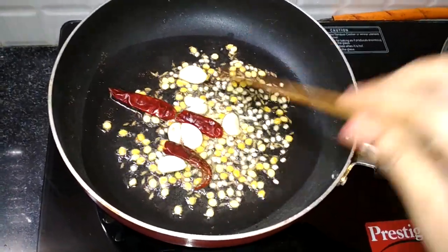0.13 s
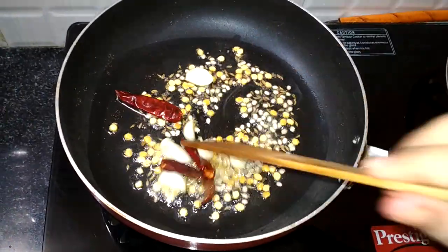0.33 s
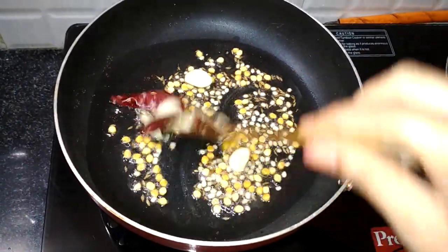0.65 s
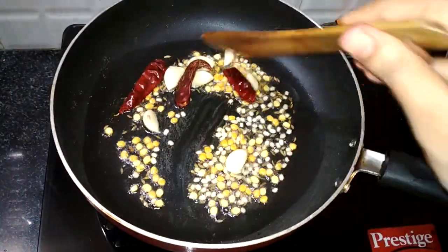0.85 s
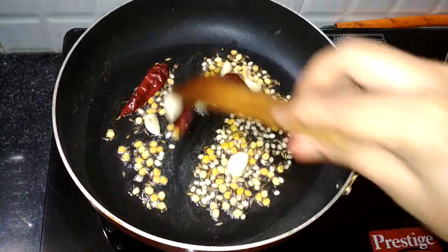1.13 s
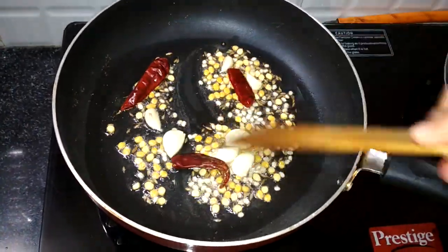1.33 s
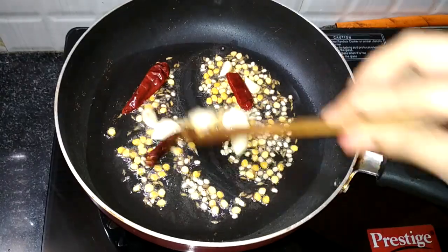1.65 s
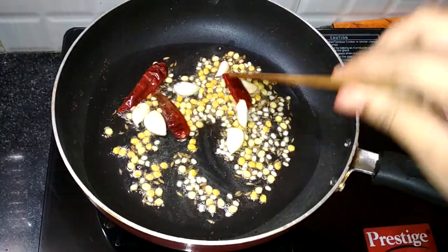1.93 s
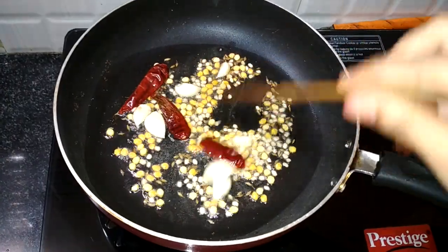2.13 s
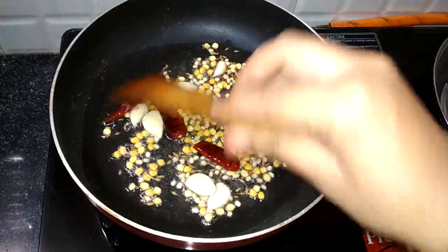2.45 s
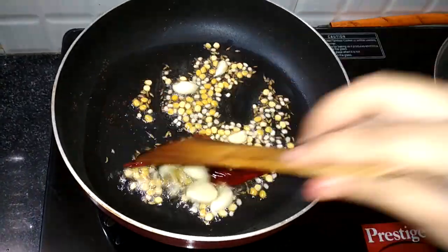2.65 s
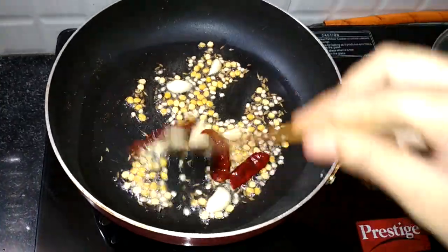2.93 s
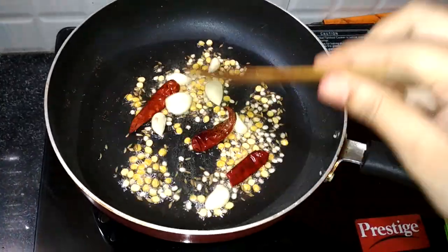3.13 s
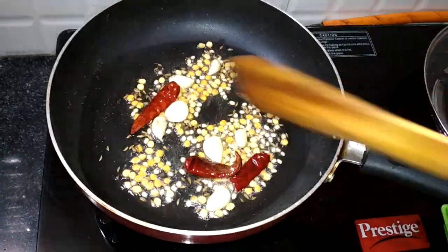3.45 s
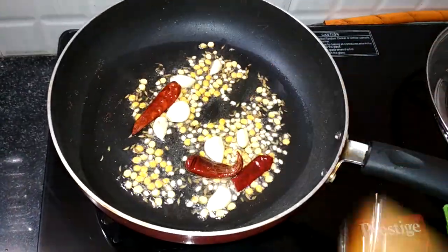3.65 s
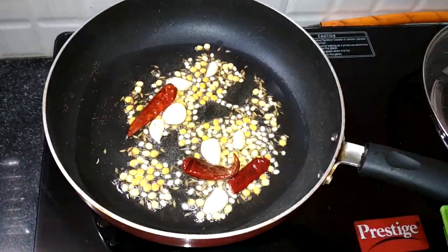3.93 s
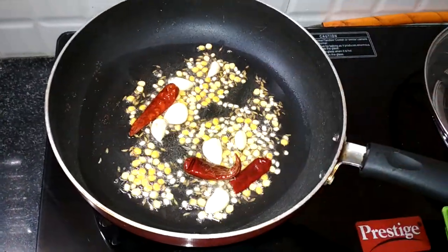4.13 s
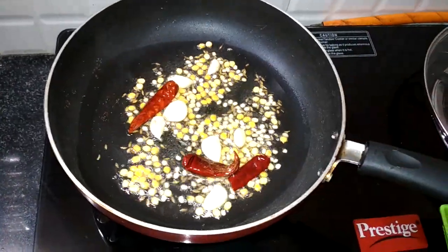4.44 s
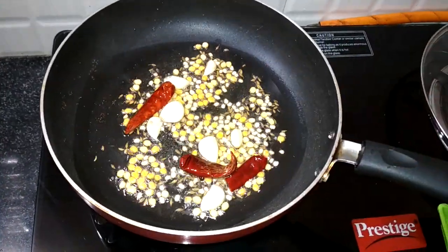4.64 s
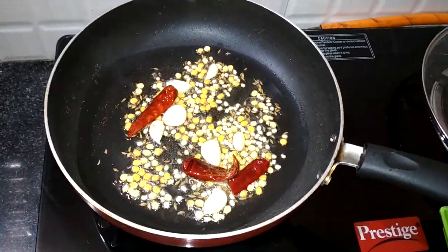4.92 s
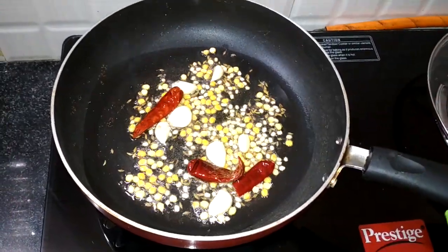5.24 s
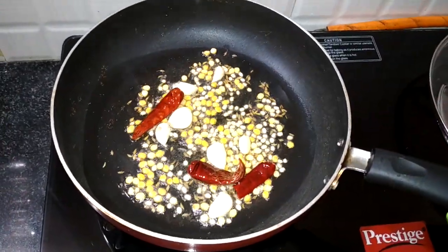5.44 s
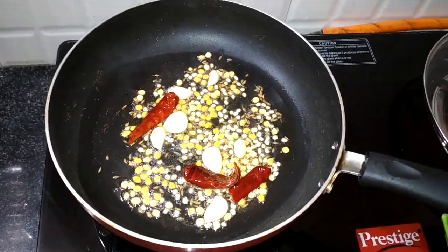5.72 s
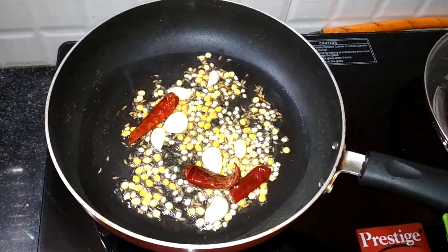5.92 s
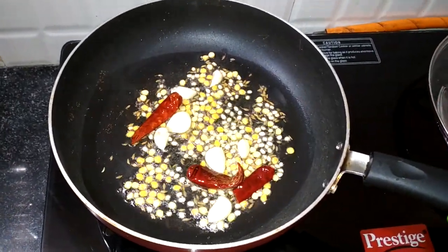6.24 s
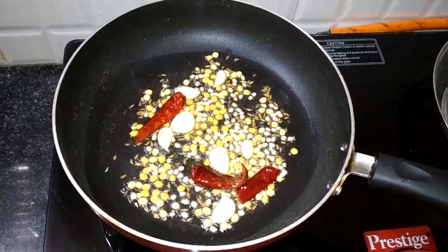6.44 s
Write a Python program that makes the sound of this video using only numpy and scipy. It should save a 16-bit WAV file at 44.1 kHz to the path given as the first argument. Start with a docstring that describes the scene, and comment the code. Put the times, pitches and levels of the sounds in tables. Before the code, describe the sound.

Close sizzling of seeds frying in oil, with wooden spatula scrapes and a louder hiss that sinks to light crackles and pops.

```python
"""Close frying: sizzle flares for a second and a half, then sinks, with crackle, spits and pops over a low drone.
Lentils, seeds, garlic and chillies fry in hot oil in a small kitchen; a wooden spatula stirs, then is put down.
Sizzle is a crowd of tiny decaying sine bursts; pops are short rings with spray; spits are clicks and steam jets.
Spatula, cracks and knocks are noise or clicks through resonances and spectra; pan thuds add decaying sines.
Walls are short noise tails; the background is shaped noise and a faint wandering tone."""
import sys
import numpy as np
from scipy import signal
from scipy.fft import rfft, irfft, next_fast_len
from scipy.io import wavfile
from scipy.ndimage import uniform_filter1d, map_coordinates

SR = 44100
rng = np.random.default_rng(int(sys.argv[2]) if len(sys.argv) > 2 else 0)


def digitize_waveform(pressure):
    """Quantize a signal to 16-bit integers and store it at the path in sys.argv[1].

    Rows of a 2-D input are taken as channels; values are limited to [-1, 1].
    """
    field = np.atleast_2d(pressure).T
    bounded = np.clip(field, -1, 1)
    quanta = np.round(bounded * 32767).astype(np.int16)
    wavfile.write(sys.argv[1], SR, quanta)


N = 290178

# Levels are before any trim in the function concerned; positive pan is left.
# Low rumble spectrum. Each row: frequency in Hz, relative level in dB.
RUMBLE_SPECTRUM = [(12, -8.5), (22, -8), (35, -26), (60, -20), (100, -26), (300, -61)]
# Kitchen drone spectrum. Each row: frequency in Hz, relative level in dB.
DRONE_SPECTRUM = [(50, -14), (80, -10), (105, 0.5), (128, -13.5), (160, -11), (300, -10), (550, -17),
                  (1500, -24), (4000, -71)]
# Background swells. Each row: centre in seconds, 1/e half length in seconds, rumble in dB, boom in dB.
SWELLS = [(0.996, 0.085, -84, -60), (4.144, 0.6, -79, -68.5), (4.804, 0.14, -67, -68),
          (5.086, 0.12, -83, -60), (5.494, 0.11, -66, -57.5), (6.2, 0.62, -92, -76)]
# Faint tone that comes and goes. Each row: time in seconds, level in dB.
HUM_LEVELS = [(3.35, -90), (3.75, -76.5), (3.9, -75.5), (4.4, -73), (4.55, -78), (4.75, -90)]
# Wall decay. Each row: frequency in Hz, t60 in seconds.
WALL_DECAY = [(200, 0.056), (2000, 0.17), (8000, 0.098), (16000, 0.034)]
# Oil drops by the right port. Each row: time in seconds, level in dB, recovery in seconds.
OIL_DROPS = [(1.631, -25, 0.0061), (2.2628, -24, 0.013)]
# Flutter after a drop lands. Each row: frequency in Hz, relative level in dB.
DROP_FLUTTER = [(30, 3.0), (150, -21), (600, -20.5), (3000, -67)]
# Spatula knocks on the counter. Each row: time in seconds, knock level in dB, low thump level in dB.
KNOCKS = [(3.965, -41, -68), (3.9805, -27.5, -42), (3.9913, -29.5, -49), (3.998, -36, -60),
          (4.173, -32, -62), (4.183, -26, -70), (4.1954, -22, -46), (4.209, -31, -59)]
# Counter knock spectrum. Each row: frequency in Hz, relative level in dB.
COUNTER_SPECTRUM = [(35, -42), (60, -18), (130, -13), (240, -37), (350, -9), (480, -9.5), (620, -12.5),
                    (964, -4.5), (1070, 1), (2090, -4), (2360, 4.5), (2920, -7.5), (3200, -20), (4000, -28),
                    (5200, -61), (8800, -120)]
# Pan shifting on the hob. Each row: time in seconds, level in dB.
PAN_SHIFTS = [(0.621, -35), (0.646, -46.5), (2.942, -33), (2.967, -46)]
# Modes of the pan base. Each row: frequency in Hz, relative level in dB, t60 in seconds.
PAN_MODES = [(255, -1, 0.15), (311, 14.5, 0.095), (338.7, 1.5, 0.15)]
# Scuff of the pan on the hob. Each row: frequency in Hz, relative level in dB.
SCUFF_SPECTRUM = [(100, -28), (300, -5), (700, -22), (2000, -28)]
# Spatula sweeps. Each row: start in seconds, length in seconds, rubbing in dB, rolling seeds in dB.
STROKES = [(0.333, 0.068, -58.5, -67.5), (0.675, 0.063, -54, -68), (0.757, 0.049, -52, -63),
           (0.954, 0.12, -50.5, -48), (1.223, 0.076, -50.5, -40), (1.394, 0.021, -51.5, -44.5),
           (1.617, 0.17, -55, -51.5), (1.92, 0.29, -82, -57), (2.25, 0.033, -58, -47),
           (2.394, 0.029, -66, -45), (2.565, 0.11, -72, -55), (2.993, 0.21, -69, -52.5),
           (3.302, 0.063, -61, -61.5), (3.57, 0.25, -71, -67)]
# Spatula taps on the pan. Each row: time in seconds, peak in dB, resonance in Hz, t60 in seconds.
TAPS = [(0.233, -46, 810, 0.17), (0.332, -45.5, 865, 0.014), (0.352, -43.5, 870, 0.017),
        (0.419, -46, 830, 0.027), (0.827, -33, 1220, 0.013), (0.967, -20, 1500, 0.016),
        (1.059, -31.5, 2000, 0.05), (1.244, -27, 2900, 0.016), (2.273, -30, 1390, 0.014),
        (2.435, -30, 1420, 0.024), (2.866, -32.5, 1950, 0.014), (3.07, -26.5, 2700, 0.012),
        (3.112, -31, 1520, 0.014), (3.1594, -27, 1650, 0.011), (3.303, -34.5, 744, 0.02),
        (3.326, -38, 1200, 0.012), (3.342, -42, 715, 0.012), (3.364, -52, 700, 0.012)]
# Rolling seeds spectrum. Each row: frequency in Hz, relative level in dB.
ROLLING_SPECTRUM = [(500, -39), (1200, -8.5), (2000, -12), (2700, -1.5), (4200, -1), (6500, -7),
                    (12000, -27)]
# Rubbing wood spectrum. Each row: frequency in Hz, relative level in dB.
RUBBING_SPECTRUM = [(120, -44), (300, -11), (450, -29.5), (650, -4.5), (980, 3), (1200, -0.5),
                    (1550, -15.5), (2000, -13.5), (6000, -10)]
# Seeds cracking. Each row: time in seconds, level in dB, nominal pitch in Hz.
SEED_CRACKS = [(0.057, -24.5, 1570), (0.829, -10.5, 2900), (1.166, -20.5, 1910), (1.307, -22, 3600),
               (1.3483, -25, 2800), (1.4038, -24, 2000), (1.4623, -14, 2200), (1.6328, -10, 2350),
               (1.825, -16.5, 1870), (1.9328, -14, 2210), (2.043, -27, 1500), (2.057, -25, 3200),
               (2.2627, -20.5, 1510), (2.2973, -18, 1800), (2.3602, -16.5, 1500), (2.363, -19, 1500),
               (2.604, -21, 1660), (2.6826, -36, 2200), (2.84, -20.5, 1800), (2.993, -24.5, 1900),
               (3.4188, -27, 2800), (3.567, -29, 2000), (3.63, -27, 2000), (3.6385, -29, 2400),
               (3.7065, -25, 2200), (3.7176, -24, 3200), (3.773, -32, 3000), (4.0787, -26, 1500),
               (4.4614, -30, 2900), (4.5516, -25.5, 2520), (4.7269, -15, 4000), (4.742, -21, 2800),
               (4.747, -9.5, 1960), (4.846, -28, 2200), (4.964, -24, 2400), (4.996, -21.5, 1600),
               (5.0063, -13, 2620), (5.063, -31, 2500), (5.224, -31, 2400), (5.2504, -30, 2010),
               (5.2907, -28, 1900), (5.307, -28.5, 1640), (5.749, -25, 2200), (5.775, -29.5, 2000),
               (5.8857, -16.5, 1360), (5.937, -21.5, 2200), (6.0277, -37, 2200), (6.0487, -36, 2200),
               (6.146, -23, 1720), (6.1915, -40, 2200), (6.2573, -28, 2400), (6.389, -33, 2180),
               (6.4926, -36, 3520)]
# Wet seeds squealing. Each row: start in seconds, level in dB.
SQUEALS = [(-0.012, -25), (0.047, -31.5), (6.498, -14.5)]
# Squeal resonances, before a treble tilt. Each row: frequency in Hz, width in Hz, relative level in dB.
SQUEAL_MODES = [(12030, 540, -1.5), (13800, 1200, -8), (13550, 260, 1)]
# Loudest steam jets. Each row: time in seconds, opening tick in dB, steam in dB, pitch in Hz,
# left-right difference in dB, steam t60 in seconds.
STEAM_SPITS = [(0.294, -57, -53.5, 6600, -12, 0.16), (0.441, -40, -47, 8400, -9, 0.23),
               (0.729, -40, -46.5, 8600, -13, 0.37), (0.859, -22, -38, 7300, 3, 0.28),
               (1.669, -16, -41, 6300, -6, 0.073), (1.915, -8.5, -43, 7200, -1, .04),
               (2.4716, -22, -30.5, 6630, 0, .08), (2.511, -16, -35.5, 6700, -2, 0.14),
               (2.804, -45, -50.5, 2000, -6, 0.11), (2.8433, -19, -33.5, 9650, -2, 0.21),
               (3.1629, -14, -40, 6260, 3, 0.25), (3.229, -23.5, -46, 5640, 4, .08),
               (3.4338, -24, -39.5, 5570, -3.5, 0.33), (3.675, -32, -48, 5800, -4.5, .06),
               (3.789, -33, -48.5, 3930, -5, 0.13), (3.935, -36, -43.5, 5500, -6, 0.045),
               (4.245, -24, -48, 7100, -7.5, 0.083), (4.3457, -24.5, -45.5, 5960, -9, 0.16),
               (4.542, -28, -46.5, 5670, -0.5, 0.18), (4.653, -40, -45.5, 4170, 0, 0.077),
               (4.7282, -27, -42.5, 3250, 1.5, 0.2), (4.871, -48, -56, 980, 0, 0.081),
               (5.035, -23.5, -43, 7000, 2, 0.13), (5.107, -22, -41, 8750, 2, 0.15),
               (5.168, -39, -50, 5270, -9, .06), (5.377, -33, -42, 6700, 0.5, 0.16),
               (5.5586, -29.5, -55, 5730, -9, 0.032), (5.648, -28.5, -44, 6250, -5, 0.068),
               (5.7155, -21.5, -46, 4300, 0, 0.18), (5.8712, -19.5, -44, 6060, -0.5, 0.19),
               (5.9208, -24, -51, 6800, -3, 0.049), (6.0873, -24, -41, 6300, 2, 0.2),
               (6.2557, -38, -50, 6260, 5, 0.049), (6.4554, -44, -51, 5650, -6.5, 0.17)]
# Loudest bursting bubbles. Each row: time in seconds, level in dB, pitch in Hz, left-right difference in dB.
LOUD_POPS = [(0.0408, -37, 11900, 14), (0.0624, -14.5, 12900, -20), (0.1657, -17, 12700, 4),
             (0.454, -27, 9300, 8), (0.6865, -24, 10300, -10), (0.7288, -18, 8700, -14),
             (0.829, -13, 8000, -8), (0.952, -6, 12600, 20), (0.9692, -14, 13000, 9),
             (1.0607, -10, 11500, -5), (1.1116, -3, 7940, -13), (1.1228, -4, 11500, -1),
             (1.1362, -2, 11100, -1), (1.1563, -2, 11300, -5), (1.226, -6, 12200, -9),
             (1.2898, -0.5, 9900, -1), (1.3358, -3, 11850, -1), (1.394, -4, 11600, -4),
             (1.4081, 0, 11600, -2), (1.461, -2.5, 11000, -9), (1.5578, -2, 11940, -7),
             (1.631, -2.5, 12300, -8), (1.667, -8, 11100, -13), (1.798, -3, 13100, -2),
             (1.843, -4, 10900, -9), (1.8716, -3, 11700, -3), (1.9978, -1.5, 11050, -2),
             (2.0303, -9, 11900, -5), (2.043, 1, 10300, -8), (2.0577, -6, 12200, -3),
             (2.0713, -4, 11800, -2), (2.08, -5, 11900, -5), (2.118, -17, 12600, -3),
             (2.1719, -4, 10600, -9), (2.2396, 1, 11740, -2), (2.2632, 0, 12540, 2), (2.294, -9, 12100, -7),
             (2.3602, -6, 11900, -1), (2.4348, -4.5, 11900, 1), (2.603, -23, 11500, 1),
             (2.6886, -21, 11800, -2), (2.8417, -7, 11100, -4), (2.8482, -26, 10500, -6),
             (2.854, -22, 9800, -6), (2.861, -18, 10500, -2), (2.9164, -25, 11700, -2),
             (3.1879, -20, 11700, -3), (3.2213, -21.5, 11100, -4), (3.37, -18.5, 11800, -2),
             (3.4416, -19, 7200, -4), (3.707, -20, 11800, -2), (3.844, -20, 11800, -2.5),
             (4.0457, -32, 12100, -2), (4.2345, -20, 11900, 0), (4.2448, -24, 9800, -13),
             (4.2638, -16.5, 11400, -4), (4.3909, -17.5, 12200, -1), (4.4774, -21, 12300, -6),
             (4.511, -17.5, 12900, -1.5), (4.5438, -17.5, 12000, 8), (4.664, -16.5, 13400, -7.5),
             (4.7133, -30, 11800, -4), (4.741, -16, 10900, -7), (4.799, -14, 11300, -3),
             (4.904, -23, 12000, -2), (4.9651, -23, 12300, 0), (5.007, -21, 11400, -2),
             (5.1002, -22, 11500, -3), (5.11, -21, 10500, -4), (5.2086, -21, 13900, 0.5),
             (5.2503, -16.5, 9000, -9), (5.29, -19.5, 12000, -7), (5.3028, -22, 12500, -2),
             (5.3208, -22, 12400, -3.5), (5.478, -20, 12000, -2), (5.5963, -21.5, 9900, -1),
             (5.6382, -21.5, 11700, -5.5), (5.709, -17.5, 11370, -3.5), (5.8412, -26, 10800, -6),
             (5.9385, -20, 14000, -3), (5.9794, -20, 12200, -6), (6.0266, -22, 11200, -1),
             (6.0607, -19, 14000, -2), (6.1156, -19, 12200, -3), (6.146, -18, 10800, -8),
             (6.257, -21, 10800, -4), (6.3755, -22.5, 12200, 3), (6.4248, -18, 13100, 2),
             (6.518, -27, 13100, 15)]
# Water boiling off. Each row: time in seconds, boil level in dB.
BOIL_LEVELS = [(0.5, -52), (0.6, -48), (0.73, -44.5), (0.93, -41), (0.95, -27.5), (1.11, -28),
               (1.125, -23.5), (1.17, -22.5), (1.47, -24), (1.69, -24), (2.02, -22), (2.455, -24),
               (2.52, -39.5), (2.7, -40.5)]
# Fine bubble spectrum. Each row: frequency in Hz, relative level in dB.
FINE_SPECTRUM = [(4410, -55), (7500, -16.5), (11600, -0.5), (14600, -4.5), (15700, -5), (16000, -22),
                 (16300, -34), (16500, -49)]
# Coarse bubble spectrum. Each row: frequency in Hz, relative level in dB.
COARSE_SPECTRUM = [(1000, -49), (2500, -13.5), (4700, -7), (5500, 0.5), (7500, 0), (9500, 1), (14000, -58)]
# Broad ticking spectrum, brightest near 6 kHz. Each row: frequency in Hz, relative level in dB.
TICKING_SPECTRUM = [(120, -13.5), (300, -8), (650, -13), (1300, -1), (3500, -6), (6000, 8.5), (12000, -4.5)]

# Background; wobble scales multiply a random curve
RUMBLE_DB, SWELL_TRIM_DB, DRONE_DB, WAVER_SCALE_DB = -69.5, 12, -69, 1.5
BOOM_HZ, BOOM_WIDTH_HZ = 111.3, 44
HUM_HZ, HUM_WANDER_SCALE_HZ = 657, 4
# Room returns, arrival and band limit
POP_ROOM_DB, OIL_ROOM_DB, WOOD_ROOM_DB, COUNTER_ROOM_DB, CRACK_ROOM_DB = -7.5, -1, -2.5, -3.5, -8
LEFT_LAG_S = .00009
TOP_HZ, CEILING = 15900, 0.95
# Spatula: the blade bites quickly, the seeds settle slowly
STROKE_ATTACK_S, STROKE_RELEASE_T60_S = 0.009, 0.32
SQUEAL_ATTACK_S, SQUEAL_HOLD_S, SQUEAL_T60_S = 0.0061, 0.013, 0.17
# Steam and random ticks; lower ticks are softer
LEAD_SAMPLES = SR // 20
TICKS_FROM_S, TICKS_PER_S = 2.5, 22
TICK_DB, TICK_SPREAD_DB, TICK_TOP_HZ = -36, 8, 7130
TICK_OCTAVES, TICK_DB_PER_OCTAVE = 2.31, 10.5
# Random pops, levelled against the boil
POPS_PER_S, POP_REL_DB, POP_CENTRE_HZ = 25, 7, 12100
# Boil: the broad ticking has its own further decline
DRY_FROM_S, DRYING_DB_PER_S, TICKING_DB_PER_S = 3.87, 2.5, 3.5
FLUTTER_SCALE_DB, FLUTTER_KNOTS_PER_S = 0.23, 14
COARSE_DB, COARSE_LAG_S = -13, 0.0063
SOFT_TICKING_UNTIL_S, EARLY_TICKING_DB = 0.6, -8.5


def amp(db):
    """Decibels to gain."""
    return 10 ** (np.asarray(db) / 20)


def unit(pair):
    """Scale a stereo pair so its centre has rms 1."""
    return pair / np.sqrt(np.mean(pair.mean(0) ** 2) + 1e-20)


def peak(pair):
    """Scale a stereo pair so its centre has peak 1."""
    return pair / (np.abs(pair.mean(0)).max() + 1e-20)


def sides(pan_db):
    """Left and right gains for a level difference."""
    return amp([[pan_db / 2], [-pan_db / 2]])


def along(points, hz):
    """Read (Hz, value) points on a log frequency axis."""
    f, v = np.transpose(points)
    return np.interp(np.log(hz + 1), np.log(f + 1), v)


def gains(rows):
    """One gain curve per dB column after the time; -120 dB outside the rows."""
    s, *cols = np.transpose(rows)
    t = np.arange(N) / SR
    return [amp(np.interp(t, s, c, left=-120, right=-120)) for c in cols]


def filtered(x, response):
    """Multiply the spectrum of x by a response of frequency."""
    n = x.shape[-1]
    m = next_fast_len(n + SR // 8)
    return irfft(rfft(x, m) * response(np.fft.rfftfreq(m, 1 / SR)), m)[..., :n]


def coloured(x, spectrum):
    """Shape x by (Hz, dB) points, at rms 1."""
    return unit(filtered(x, lambda hz: amp(along(spectrum, hz))))


def resonance(f, hz, width_hz):
    """Causal response of one damped mode."""
    return 1j * f * width_hz / (hz * hz - f * f + 1j * f * width_hz)


def noise(n, alike):
    """White stereo noise; alike is the power share common to both sides."""
    share = np.clip(alike, 0, 1)
    common = np.sqrt(share) * rng.standard_normal(n)
    return common + np.sqrt(1 - share) * rng.standard_normal((2, n))


def burst(t60_s, alike):
    """A quarter second of decaying noise."""
    t = np.arange(SR // 4) / SR
    return noise(len(t), alike) * amp(-60 * t / max(t60_s, 1e-4))


def add(track, s, sound):
    """Mix a sound into a track at time s."""
    part = track[:, max(round(s * SR), 0):]
    part[:, :sound.shape[1]] += sound[:, :part.shape[1]]


def wobble(knots_per_s):
    """Smooth random curve through normal knots."""
    knots = rng.standard_normal(int(N * knots_per_s / SR) + 4)
    return map_coordinates(knots, [np.arange(N) * knots_per_s / SR])


def crackle(per_s, spread_db, life_s, scatter_db, n=N):
    """Tiny decaying sine bursts, random in time, pitch, size and place; rms 1."""
    count = int(per_s * n / SR)
    when, pitch, phase, lag = rng.random((4, count, 1))
    size, pan = np.clip(rng.standard_normal((2, count, 1)), -2.7, 2.7)
    t = np.arange(SR // 800) / SR
    shape = amp(spread_db * size) * t / life_s * np.exp(-t / life_s)
    at = (when * n).astype(int) + np.arange(len(t))
    pair = []
    for side in (1, -1):
        shifted = t + side * (lag - .5) * life_s
        ring = np.sin(2 * np.pi * (pitch * TOP_HZ * shifted + phase))
        grains = shape * ring * amp(side * scatter_db * pan)
        pair.append(np.bincount(at.ravel(), grains.ravel(), n)[:n])
    return unit(np.array(pair))


def patchy(x, depth_db):
    """Single seeds take turns: smoothed random gains over time and frequency, at rms 1."""
    z = signal.stft(x, nperseg=512)[2]
    field = rng.standard_normal(z.shape[1:])
    for _ in range(2):
        across_hz = uniform_filter1d(field, size=7, axis=0)
        field = uniform_filter1d(across_hz, size=6, axis=1)
    uneven = z * amp(depth_db * field / field.std())
    return unit(signal.istft(uneven, nperseg=512)[1][:, :N])


def background():
    """Shaped noise rumbles and drones, a low resonance booms, a thin wandering tone surfaces."""
    t = np.arange(N) / SR
    swell, boom = sum(amp([[rumble_db], [boom_db]]) * np.exp(-((t - s) / half_s) ** 2)
                      for s, half_s, rumble_db, boom_db in SWELLS)
    rumble_gain = np.hypot(amp(RUMBLE_DB), amp(SWELL_TRIM_DB) * swell) * amp(WAVER_SCALE_DB * wobble(14))
    out = rumble_gain * coloured(noise(N, alike=0.9), RUMBLE_SPECTRUM)
    drone_gain = amp(DRONE_DB + WAVER_SCALE_DB * wobble(11))
    out += drone_gain * coloured(noise(N, alike=0.93), DRONE_SPECTRUM)
    out += boom * unit(filtered(noise(N, alike=0.8), lambda f: resonance(f, BOOM_HZ, BOOM_WIDTH_HZ) ** 2))
    phase = 2 * np.pi * np.cumsum(HUM_HZ + HUM_WANDER_SCALE_HZ * wobble(12)) / SR
    return out + gains(HUM_LEVELS)[0] * amp(3 * wobble(18)) * np.sin(phase)


def kitchen(x):
    """Tiled walls return a short noise tail, separate per side and redrawn every 1/16 s."""
    out, step = np.zeros((2, N)), SR // 16
    for start in range(0, N, step):
        hz, t, z = signal.stft(rng.standard_normal((2, SR // 5)), SR, nperseg=256)
        decay = amp(-60 * t / along(WALL_DECAY, hz)[:, None])
        tail = signal.istft(z * decay, SR, nperseg=256)[1]
        tail = tail / np.linalg.norm(tail, axis=1, keepdims=True)
        add(out, start / SR, signal.fftconvolve(x[:, start:start + step], tail, axes=1))
    return out


def drops():
    """A flung oil drop lands by the right port: short push, then suction recovering with a low flutter."""
    out, t = np.zeros((2, N)), np.arange(-SR // 20, SR // 5) / SR
    for s, db, recovery_s in OIL_DROPS:
        push = -np.tanh(t / 0.00021) * np.exp(-np.abs(t) / np.where(t < 0, 0.0014, recovery_s))
        flutter = coloured(noise(len(t), alike=0.12), DROP_FLUTTER)
        fade = (t > 0) * amp(-11 - 60 * np.abs(t) / (25 * recovery_s))
        add(out, s + t[0], amp(db - 12.0) * sides(-22.5) * (push + fade * flutter))
    return out


def put_down():
    """The spatula lands in two bunches of dull wooden knocks that excite low counter resonances."""
    out = np.zeros((2, N))
    for s, db, thump_db in KNOCKS:
        blow = burst(t60_s=0.014, alike=0.58) + amp(-7) * burst(t60_s=0.12, alike=0.49)
        knock = coloured(blow, COUNTER_SPECTRUM)
        thump = filtered(burst(t60_s=0.19, alike=0.9), lambda f: resonance(f, 111, 42) - resonance(f, 356, 60))
        add(out, s, amp(db - 1.0) * peak(knock) + amp(thump_db + 2.0) * peak(thump))
    return out


def pan_base():
    """Pushed by the spatula, the pan slips on the hob: decaying base modes plus scuff noise."""
    out, t = np.zeros((2, N)), np.arange(SR // 4) / SR
    for s, db in PAN_SHIFTS:
        ring = sum(amp(level_db - 60 * t / t60_s) * np.sin(2 * np.pi * hz * t)
                   for hz, level_db, t60_s in PAN_MODES)
        thud = peak(ring * (1 - np.exp(-t / 0.012)) * sides(0))
        scuff = coloured(burst(t60_s=0.36, alike=0.84), SCUFF_SPECTRUM)
        add(out, s - .003, amp(db - 7) * (thud + amp(-7) * peak(scuff)))
    return out


def stroke(start_s, length_s):
    """Attack, hold and release of one sweep."""
    t = np.arange(N) / SR - start_s
    attack = np.clip(1 + t / STROKE_ATTACK_S, 0, 1)
    return attack * amp(-60 * np.maximum(t - length_s, 0) / STROKE_RELEASE_T60_S)


def spatula():
    """Wood rubs the pan and rolls seeds as shaped crackle; taps are noise through an oil-damped mode."""
    rattle = coloured(crackle(per_s=600, spread_db=2.5, life_s=0.00005, scatter_db=4.5), ROLLING_SPECTRUM)
    rub = coloured(crackle(per_s=9000, spread_db=3.5, life_s=.00005, scatter_db=-1.0), RUBBING_SPECTRUM)
    rubbing, rolling = sum(amp([[rub_db], [roll_db]]) * stroke(s, length_s)
                           for s, length_s, rub_db, roll_db in STROKES)
    out = amp(-1.0) * rolling * patchy(rattle, depth_db=1.2) * sides(-8.5)
    out += amp(-2) * rubbing * rub * sides(-3.5)
    for s, db, hz, t60_s in TAPS:
        tap = filtered(burst(t60_s, alike=0.96), lambda f: resonance(f, hz, 0.87 * hz) ** 2)
        add(out, s, amp(db) * peak(tap))
    return out


def snaps():
    """A cracking seed: an impulse and short crumble through one broad resonance."""
    out = np.zeros((2, N))
    for s, db, hz in SEED_CRACKS:
        crack = amp(-23) * burst(t60_s=0.014, alike=0.4)
        crack[:, 0] += 1
        snap = filtered(crack, lambda f: resonance(f, 0.86 * hz, 1.5 * hz))
        add(out, s, amp(db - 3) * peak(snap))
    return out


def squeal():
    """Steam from wet seeds at the left: noise through high resonances, with quick attack and decay."""
    def whistle(f):
        modes = sum(amp(db) * resonance(f, hz, width_hz) for hz, width_hz, db in SQUEAL_MODES)
        return modes * (f / TOP_HZ) ** 3

    steam = filtered(noise(N, alike=0.14), whistle)
    t = np.arange(N) / SR
    level = np.zeros(N)
    for s, db in SQUEALS:
        attack = np.clip((t - s) / SQUEAL_ATTACK_S, 0, 1)
        level += attack * amp(db - 60 * np.maximum(t - s - SQUEAL_HOLD_S, 0) / SQUEAL_T60_S)
    return amp(-7.0) * level * unit(steam * sides(21))


def tick(hz, t60_s):
    """A vent snaps open: impulse and crumble through a damped resonance."""
    click = amp(-15) * burst(t60_s, alike=0.33)[:, :SR // 50]
    click[:, 0] += 1
    return peak(filtered(click, lambda f: resonance(f, hz, 0.65 * hz) ** 2))


def jet(hz, rel_width, t60_s, rise_t60_s):
    """Steam builds up and fades: a train of bubbles around one pitch."""
    t = np.arange(-LEAD_SAMPLES, SR // 6) / SR
    train = crackle(per_s=1300, spread_db=4.5, life_s=0.00007, scatter_db=4.0, n=len(t))
    swell = np.where(t < 0, amp(-60 * np.abs(t) / rise_t60_s), amp(-60 * np.abs(t) / t60_s))
    return swell * unit(filtered(train, lambda f: resonance(f, hz, rel_width * hz) ** 2))


def spits():
    """Seed vents tick open with steam around the tick; lesser vents only tick, at random."""
    out = np.zeros((2, N))
    for s, tick_db, steam_db, hz, pan_db, t60_s in STEAM_SPITS:
        add(out, s, amp(tick_db) * tick(hz, t60_s=0.01) * sides(pan_db - 8))
        steam = jet(hz, rel_width=0.39, t60_s=t60_s, rise_t60_s=0.041)
        add(out, s - LEAD_SAMPLES / SR, amp(steam_db) * steam * sides(pan_db - 2.0))
    span_s = N / SR - TICKS_FROM_S
    for when, depth, size, place in rng.random((int(TICKS_PER_S * span_s), 4)):
        octaves = TICK_OCTAVES * depth  # deeper pockets tick lower
        db = TICK_DB - TICK_DB_PER_OCTAVE * octaves + TICK_SPREAD_DB * (2 * size - 1)
        vent = tick(TICK_TOP_HZ / 2 ** octaves, t60_s=0.0022)
        add(out, TICKS_FROM_S + when * span_s, amp(db) * vent * sides(-7 * place))
    return out


def pop(hz, pan_db):
    """A big bubble bursts: a few cycles at its own pitch plus a brief noise spray."""
    t = np.arange(SR // 40) / SR
    rise = t / 0.00019
    ring = rise ** 2 * np.exp(2 * (1 - rise)) * np.sin(2 * np.pi * (hz * t + rng.random()))
    spray = noise(len(t), alike=0.49) * np.exp(-t / 0.0009)
    spray = filtered(spray, lambda f: resonance(f, hz, 0.59 * hz) ** 2)
    return peak((ring + amp(-3) * peak(spray)) * sides(pan_db))


def pops(heat):
    """Listed bubbles stand out; random lesser ones grow with the boil."""
    out = np.zeros((2, N))
    for s, db, hz, pan_db in LOUD_POPS:
        add(out, s, amp(db - 1.2) * pop(hz, pan_db))
    count = int(POPS_PER_S * N / SR)
    for when, (size, pitch, place) in zip(rng.random(count), rng.uniform(-0.52, 1, (count, 3))):
        gain = amp(POP_REL_DB + 2 * size) * heat[int(when * N)] ** 0.79
        add(out, when * N / SR, gain * pop(POP_CENTRE_HZ * 2 ** (.2 * pitch), 6 * place - 2.5))
    return out


def boil():
    """Boil strength: flares as wet food meets hot metal, sinks as it dries, with slight flutter."""
    t = np.arange(N) / SR
    s, db = np.transpose(BOIL_LEVELS)
    drying_db = DRYING_DB_PER_S * np.maximum(t - DRY_FROM_S, 0)
    flutter_db = FLUTTER_SCALE_DB * wobble(FLUTTER_KNOTS_PER_S)
    return amp(np.interp(t, s, db) - drying_db + flutter_db)


def sizzle(heat):
    """Water boils out of the food: fine bubbles, fewer late coarse ones and broad thin ticking."""
    flare = np.clip(heat / amp(-28.0), 0, 1)  # crossfade to the dense crackle
    sparse = coloured(crackle(per_s=4500, spread_db=4.5, life_s=.0001, scatter_db=2.0), FINE_SPECTRUM)
    dense = coloured(crackle(per_s=4200, spread_db=4.5, life_s=0.00008, scatter_db=2.0), FINE_SPECTRUM)
    fine = np.sqrt(1 - flare) * sparse + np.sqrt(flare) * dense
    coarse = coloured(crackle(per_s=950, spread_db=5.0, life_s=0.00007, scatter_db=3.0), COARSE_SPECTRUM)
    t = np.arange(N) / SR
    coarse_gain = amp(COARSE_DB) * np.interp(t - COARSE_LAG_S, t, heat)
    ticking = coloured(crackle(per_s=760, spread_db=4.5, life_s=.00007, scatter_db=1.5), TICKING_SPECTRUM)
    out = amp(-0.85) * heat * fine * sides(-2.0)
    out += coarse_gain * patchy(coarse, depth_db=2.5) * sides(-5.0)
    drying_db = TICKING_DB_PER_S * np.maximum(t - DRY_FROM_S, 0)
    early_db = EARLY_TICKING_DB * (t < SOFT_TICKING_UNTIL_S)
    ticking_gain = amp(-45.0 - drying_db + early_db) * heat ** 0.29
    return out + ticking_gain * patchy(ticking, depth_db=1.0)


def scene():
    """Near sources reach the left port slightly late; room, background and drops are added."""
    heat = boil()
    oil = sizzle(heat) + spits() + squeal()
    bursts = pops(heat)
    wood = spatula()
    counter = put_down()
    cracks = snaps() + pan_base()
    to_room = amp(OIL_ROOM_DB) * oil + amp(POP_ROOM_DB) * bursts + amp(WOOD_ROOM_DB) * wood
    to_room += amp(COUNTER_ROOM_DB) * counter + amp(CRACK_ROOM_DB) * cracks
    lags_s = np.array([[LEFT_LAG_S], [0]])
    direct = filtered(oil + bursts + wood + counter + cracks, lambda hz: np.exp(-2j * np.pi * hz * lags_s))
    return direct + kitchen(to_room) + background() + drops()


def record(dry):
    """Round off the loudest peaks, then low-pass steeply at the band limit."""
    held = dry / (1 + np.abs(dry / CEILING) ** 6) ** (1 / 6)
    return filtered(held, lambda hz: 1 / (1 + (hz / TOP_HZ) ** 200))


dry = scene()
out = record(dry)
digitize_waveform(out)
```